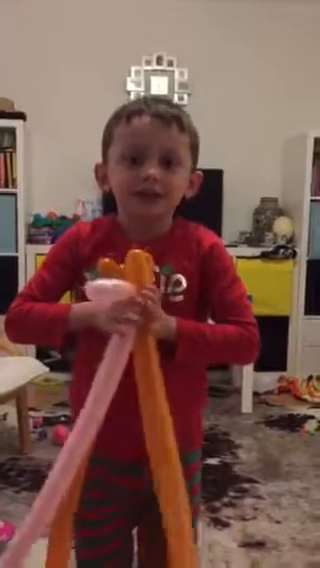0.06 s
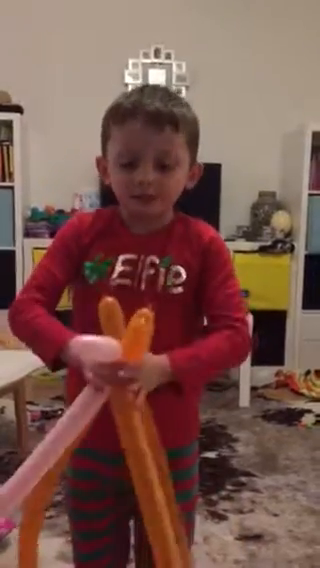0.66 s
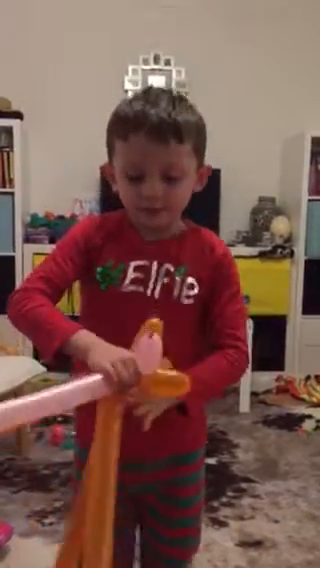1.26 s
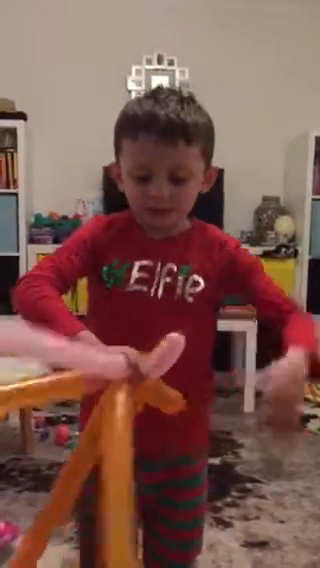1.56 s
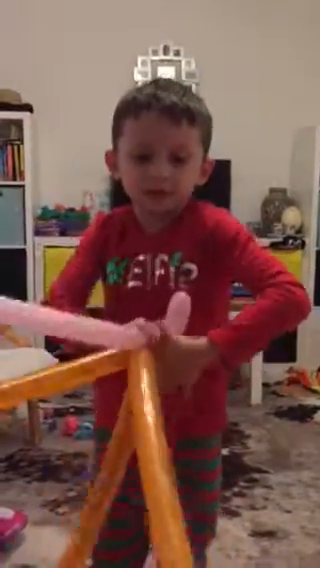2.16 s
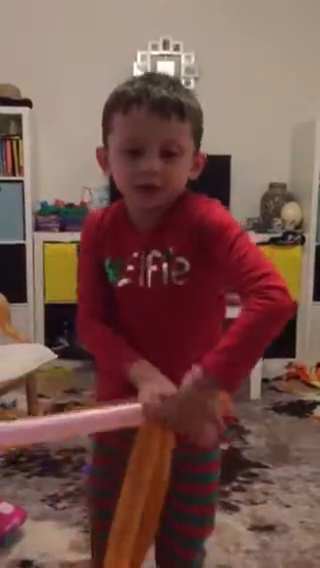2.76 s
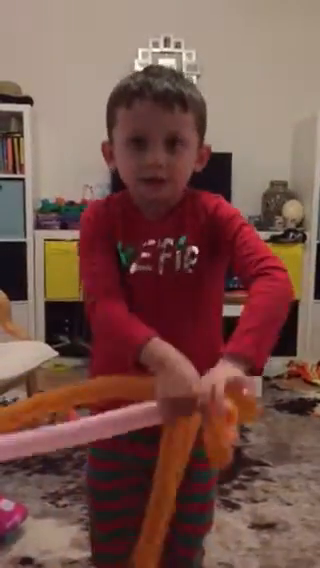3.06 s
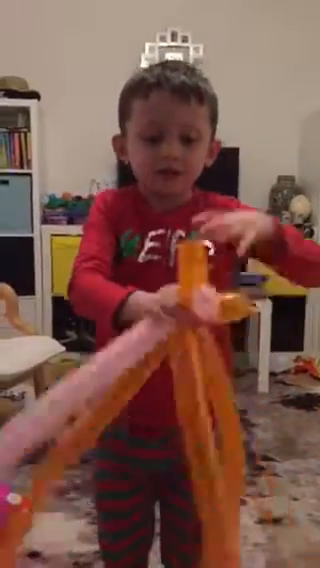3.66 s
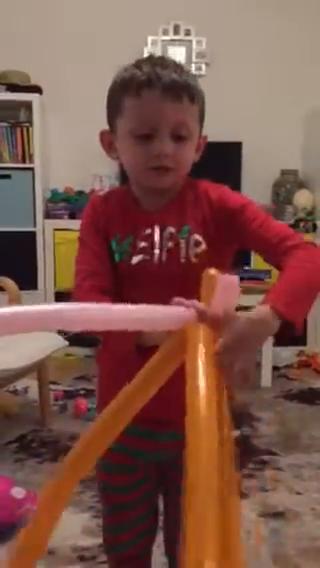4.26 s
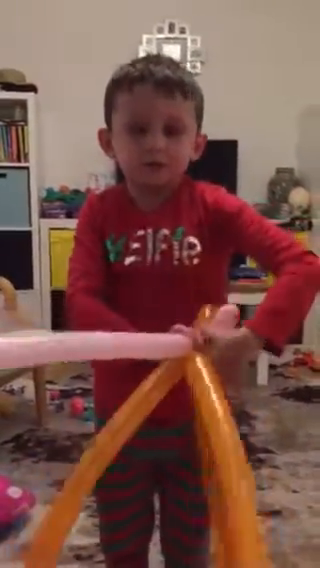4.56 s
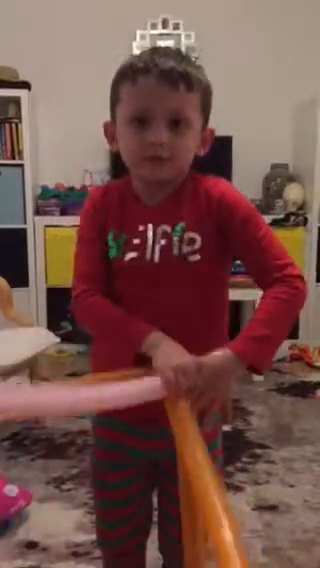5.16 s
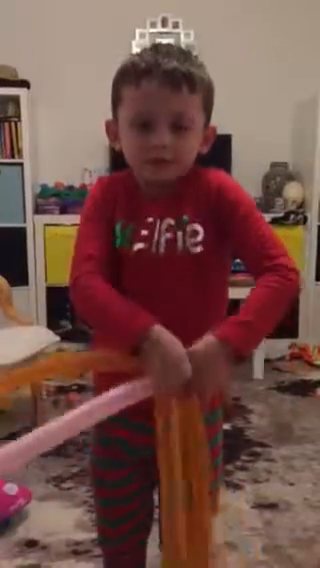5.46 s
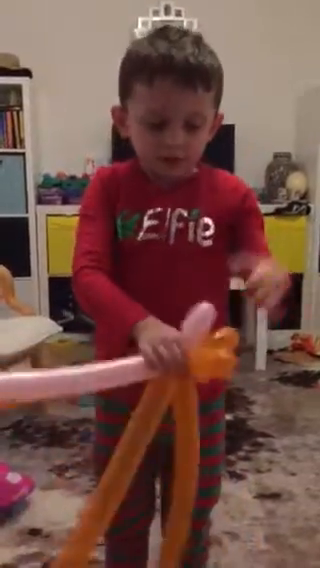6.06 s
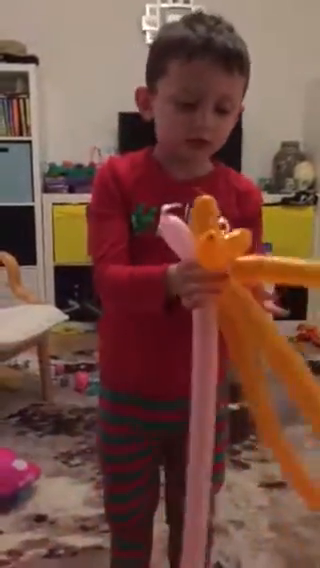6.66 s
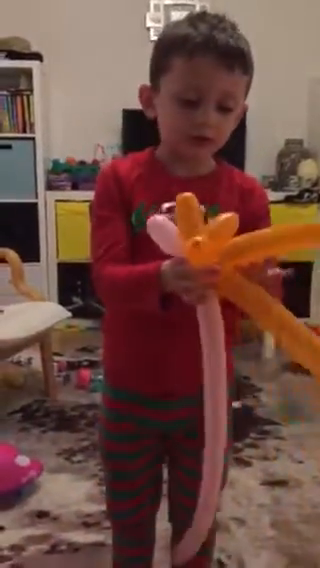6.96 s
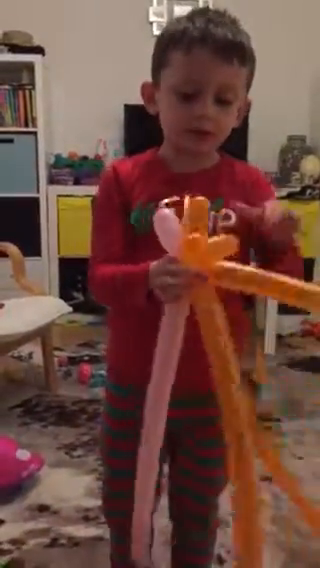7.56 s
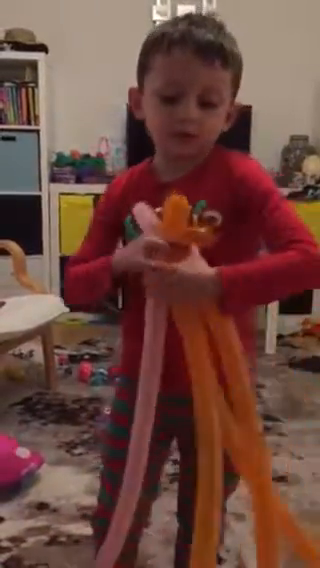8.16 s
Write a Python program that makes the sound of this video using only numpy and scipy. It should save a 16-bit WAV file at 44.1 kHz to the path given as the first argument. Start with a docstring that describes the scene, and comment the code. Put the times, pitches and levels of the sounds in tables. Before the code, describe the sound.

Close by in a softly reverberant room, hands twist long balloons, making uneven rubbery snaps, creaks and short scraping rubs with small gaps between them. The tubes bump with a hollow sound and brush against cloth. Two strong snaps stand out around the middle, and some short squeaks follow. Near the end comes the busiest, loudest flurry of snaps, then a faint crackle of fingers gripping the latex.

```python
"""Long latex balloons are twisted together by hand in a living room.
Stick-slip friction drives the stretched skin: one release is a snap, irregular slips are a rub,
periodic slips are a creak or, when faster, a squeak. Knocks send bending waves along the tubes,
and the air in a tied-off bubble resonates. Fingers creep, latex hisses over a sleeve,
and the room reverberates above a faint hush."""
import sys
import numpy as np
from scipy import signal
from scipy.fft import rfft, irfft
from scipy.io import wavfile
from scipy.ndimage import uniform_filter1d, map_coordinates

SR = 44100
rng = np.random.default_rng(int(sys.argv[2]) if len(sys.argv) > 2 else 0)


def dump_mix(stems):
    """Bounce the given channels to the path in sys.argv[1] as a 16-bit WAV at rate SR."""
    frames = np.atleast_2d(stems).T  # one column per channel
    limited = np.clip(frames, -1, 1)  # hard clip at full scale
    pcm = np.round(limited * 32767).astype(np.int16)
    wavfile.write(sys.argv[1], SR, pcm)


N = 366030
TAPS = 2048
BINS = np.maximum(np.fft.rfftfreq(TAPS, 1 / SR), 1)  # filter frequencies in Hz


def snaps(gentle_db=-21, chatter=0.4, chatter_s=0.0013, low_cut_hz=260):
    """Impulsive release: the skin lets go at once and chatters, more briefly where it is taut."""
    # sudden slips: start_s, level_db, taut_db, patch_hz
    releases = [(0.0868, -6.5, -6.5, 3050), (0.1426, -8, -6.5, 1080), (0.1499, -9.5, -5, 2670),
                (0.1626, 2.5, -2, 2340), (0.1868, -22, -7, 2540), (0.2707, -20, -5, 2500),
                (0.2928, -23.5, -4.5, 3040), (0.6192, -11.5, -3, 2000), (0.696, -9, -8.5, 1010),
                (0.871, -21.5, 11.5, 1400), (1.047, -11.5, -5, 730), (1.4071, -16, -9.5, 730),
                (1.962, -18.5, -4, 2380), (1.987, -27, 4, 2400), (2.0697, -20.5, -6, 9500),
                (2.7541, -18.5, 1.5, 910), (2.899, -22.5, 2.5, 9860), (2.966, -15, 1, 6770),
                (3.41, -19, 4.5, 5600), (3.6268, -6, -8.5, 1800), (3.7401, -16, -7.5, 5270),
                (3.7529, -12, -11, 674), (4.0183, 3, -10, 1650), (4.457, -21, 0.5, 6000),
                (4.5581, 4, 1.5, 3750), (4.7738, -19.5, -5, 7600), (5.2228, -18.5, -10.5, 1510),
                (5.258, -25.5, -6.5, 6460), (5.369, -19, -1.5, 820), (5.4389, -10, 1, 910),
                (5.4678, -12.5, -5, 6460), (5.5124, -1.5, -2, 11800), (5.9108, 0, -4.5, 1400),
                (6.2251, -19.5, 9, 1250), (6.3188, -25.5, 7.5, 12300), (6.3398, -35.5, 11.5, 11400),
                (6.3994, -21, -1, 12600), (6.6295, -21.5, -5, 1820), (6.8611, -9.5, -3, 9860),
                (6.8734, -9, -5, 7200), (6.8787, 6, 1, 3900), (6.8918, 0, -3.5, 3380),
                (6.909, -4, -8, 5500), (6.9371, -10, -2.5, 700), (6.9474, -5.5, -8, 3800),
                (7.03, -4.5, -11, 3470), (7.0972, 10.5, -1.5, 9100), (7.2739, -3.5, -4, 955),
                (7.3046, -10.5, -3.5, 5100), (7.3933, -11, -5.5, 1300), (7.4436, -6.5, -10, 610),
                (7.4509, -11, -7, 3260), (7.5, -6, -9, 2080), (7.8229, -9.5, 4.5, 2720),
                (7.8291, -7, 7.5, 3100), (7.954, -1.5, -4.5, 1640), (8.226, -9.5, 2, 1080)]
    out, t = np.zeros(N), clock(0.011)
    for s, db, taut_db, patch_hz in releases:
        drive = chatter * rng.standard_normal(len(t)) * np.exp(-t / chatter_s * 2 ** (taut_db / 12))
        drive[0] = -1  # the release itself
        spectrum = rfft(drive)
        drive = irfft(spectrum / np.sqrt(abs(spectrum)), len(t))  # partly flattens the spectrum
        drive /= np.linalg.norm(drive)
        tilt = stretch(taut_db, db - gentle_db)
        add(out, s, skin(drive, db, *tilt, patch_hz, patch_db=8, octaves=0.25))
    return signal.lfilter(*signal.butter(2, low_cut_hz, "high", fs=SR), out)


def rubs(gentle_db=-53, judder_db=5, catches_per_s=260, soft_hz=2500):
    """Irregular stick-slip: skin drags over skin in a shower of tiny slips and larger catches."""
    # rubbing strokes: start_s, length_s, level_db, taut_db, patch_hz
    strokes = [(0.452, .11, -58, -1, 1090), (0.862, 0.048, -41, -7, 1430), (0.969, 0.079, -42, -6, 1770),
               (1.4, 0.12, -49.5, 0.5, 2080), (1.457, 0.019, -27.5, 2.5, 764), (2.06, 0.14, -55, -8, 2110),
               (2.752, 0.098, -55.5, -14.5, 755), (3.319, 0.01, -45.5, 1, 1120),
               (3.566, 0.096, -44.5, -1, 686), (4.098, 0.028, -31.5, 0.5, 2070),
               (4.225, 0.091, -50.5, 2.5, 12500), (4.537, 0.04, -40.5, -3.5, 2300),
               (4.736, 0.026, -47.5, -9, 2860), (4.878, 0.045, -54.5, -3.5, 1070),
               (5.184, 0.057, -57.5, -7, 1400), (5.432, 0.15, -44, -5, 6800),
               (5.766, 0.056, -31, -6.5, 9300), (5.894, 0.087, -41, -1, 1180), (6.077, 0.061, -39, -7, 616),
               (6.73, 0.024, -49, -3.5, 1420), (6.89, 0.085, -42, -8, 3880),
               (7.486, 0.017, -47, 2.5, 12100), (7.825, 0.052, -31, -2.5, 2970),
               (8.112, 0.13, -56, 2.5, 1990)]
    out = np.zeros(N)
    for s, length, db, taut_db, patch_hz in strokes:
        count = len(clock(length))
        cycles = np.cumsum(catches_per_s * np.exp(0.45 * wander(count, catches_per_s))) / SR
        # a large slip lets go more slowly
        catches = signal.lfilter(*signal.butter(1, soft_hz, fs=SR), pulse_train(cycles))
        drive = slips(count, per_s=2200, spread_db=3.5) + 0.86 * catches
        drive = np.tanh(unit_rms(drive) / 2) * amp(judder_db * wander(count, catches_per_s))
        drive = unit_rms(drive * stroke(count, skew=0.7, fullness=0.6))
        tilt = stretch(taut_db, db - gentle_db)
        add(out, s, skin(drive, db, *tilt, patch_hz, patch_db=6, octaves=0.18))
    return out


def creaks(gain_db=-3, gentle_db=-41, taut_db=-10, soft_hz=2300, jitter=0.08, uneven_db=3.5):
    """Relaxation oscillation: slack skin under steady pull slips almost periodically, with grit."""
    # creaking strokes: start_s, length_s, level_db, first_slips_per_s, last_slips_per_s, patch_hz
    strokes = [(0.587, 0.046, -48, 157, 180, 664), (0.7, 0.073, -47.5, 108, 134, 594),
               (0.822, 0.035, -49, 222, 254, 524), (1.122, 0.051, -44.5, 152, 196, 880),
               (2.279, 0.023, -52.5, 380, 280, 605), (3.959, 0.038, -50.5, 80, 103, 424),
               (4.004, 0.016, -31.5, 310, 220, 557), (4.03, 0.046, -38.5, 140, 130, 560),
               (4.085, 0.056, -30, 415, 450, 1300), (4.369, 0.0131, -46.5, 336, 410, 1520),
               (4.95, 0.045, -51, 367, 206, 720), (5.369, 0.037, -43, 210, 160, 680),
               (5.619, 0.04, -49.5, 305, 180, 2300), (5.742, 0.021, -41.5, 250, 290, 2250)]
    out = np.zeros(N)
    for s, length, db, first_per_s, last_per_s, patch_hz in strokes:
        count = len(clock(length))
        cycles = glide(count, first_per_s, last_per_s, jitter, per_s=first_per_s)
        pulses = pulse_train(cycles)
        pulses = signal.lfilter(*signal.butter(2, soft_hz, fs=SR), pulses - pulses.mean())
        grit = 0.5 * (1 - cycles % 1) ** 2 * rng.standard_normal(count)
        pressure = amp(uneven_db * wander(count, first_per_s)) * stroke(count, skew=0.71, fullness=0.26)
        drive = (pulses + grit) * pressure
        tilt = stretch(taut_db, db - gentle_db)
        add(out, s, skin(drive, db + gain_db, *tilt, patch_hz, patch_db=7, octaves=0.27))
    return out


def squeaks(jitter=0.028, flutter_db=3, rasp_db=-18):
    """Self-excited oscillation: fast stick-slip locks to a gliding tone, rasping on every cycle. The briefest
    rows, a few milliseconds long, are the short pitched ring that follows a hard snap."""
    # pitched slips, and the brief rings after hard snaps: start_s, length_s, level_db, first_hz, last_hz,
    # overtone_db_per_octave
    chirps = [(1.498, 0.029, -42.5, 575, 537, -39), (4.559, 0.0034, -24.5, 2340, 3020, -12),
              (5.625, 0.08, -45, 631, 671, -11), (6.112, 0.018, -33, 1196, 1276, -21),
              (6.121, 0.04, -43, 1306, 1385, -17), (6.161, 0.0485, -51, 1405, 1250, -23),
              (6.226, 0.039, -60, 1236, 1300, -22), (7.952, 0.0043, -31.5, 2850, 2660, -23)]
    out = np.zeros(N)
    for s, length, db, first_hz, last_hz, slope_db in chirps:
        count = len(clock(length))
        cycles = glide(count, first_hz, last_hz, jitter, per_s=493)
        tone = sum(amp(slope_db * np.log2(k)) * np.sin(2 * np.pi * k * cycles) for k in range(1, 4))
        rasp = amp(rasp_db) * unit_rms(wander(count, 6000) * (cycles % 1))
        swell = stroke(count, skew=0.99, fullness=0.78) * amp(flutter_db * wander(count, 242))
        add(out, s, amp(db) * unit_rms((tone + rasp) * swell))
    return out


def skin(drive, db, bass_db, treble_db, patch_hz, patch_db, octaves):
    """Source and filter: the latex radiates a drive, tilted in tone, and the pinched patch resonates."""
    # response of the skin over the cross modes of a tube: frequency_hz, gain_db
    response = [(40, -12), (130, -1.5), (300, -10), (620, -2), (1000, -2.5), (1450, -2), (1900, -2),
                (2900, -1.5), (3900, 1), (5000, -1), (7000, 2), (9800, -2.5), (12000, -2), (16000, -9)]
    tilt = over_frequency([(650, bass_db), (2400, 0), (8500, treble_db)], BINS)
    patch = patch_db * np.exp(-0.5 * (np.log2(BINS / patch_hz) / octaves) ** 2)
    return colour(drive, db + tilt + patch + over_frequency(response, BINS))


def stretch(taut_db, force_db):
    """Spectral tilt as (bass, treble) in dB: tension trades bass for treble; force favours the middle."""
    return -taut_db - 0.15 * force_db, taut_db - 0.31 * force_db


def pinch(x, echo_s=0.001, shift=0.3, shifts_per_s=22, reflection=-0.6, dull_hz=2200):
    """Comb filtering: slips echo over the changing span from fingers to twist, duller on each trip."""
    earlier = np.arange(N) - echo_s * SR * np.exp(shift * wander(N, shifts_per_s))
    out = echo = x
    for _ in range(3):
        delayed = map_coordinates(echo, [earlier], order=1)
        echo = reflection * signal.lfilter(*signal.butter(1, dull_hz, fs=SR), delayed)
        out = out + echo
    return out * np.std(x) / np.std(out)


def bumps(wave_db=-4, main_db=-1.5, second_db=-6, sway_hz=95):
    """Impact excitation: a knock launches a bending wave, rings two modes and sways the whole tube."""
    # knocks on a tube: start_s, energy_db, main_hz, second_hz
    knocks = [(1.047, -24, 680, 443), (1.076, -25, 129, 186), (1.237, -27.5, 253, 454),
              (1.643, -14.5, 230, 435), (1.808, -13, 154, 101), (1.856, -21, 139, 215),
              (2.648, -19, 112, 560), (2.673, -22, 654, 217), (2.75, -12.5, 370, 232),
              (3.226, -31, 334, 296), (3.625, -9.5, 474, 302), (3.751, -11, 592, 447),
              (3.833, -6.5, 221, 327), (4.0137, 2.5, 561, 300), (4.127, -16, 191, 424),
              (4.689, -20, 397, 690), (5.37, -12.5, 147, 424), (5.775, -8, 105, 388),
              (5.835, -17, 123, 190), (5.906, -13, 346, 108), (5.969, -9.5, 353, 650),
              (6.315, -20.5, 186, 126.6), (6.49, -23, 200, 296), (7.2738, -12, 660, 191),
              (7.442, -11, 602, 297), (7.499, -10.5, 484, 189), (7.824, -9.5, 709, 237),
              (8.23, -15, 255, 177)]
    out = np.zeros(N)
    for s, db, main_hz, second_hz in knocks:
        add(out, s, amp(db + wave_db) * bending_wave(1.31 * np.sqrt(main_hz * second_hz)))
        add(out, s, amp(db + main_db) * wobble(main_hz) + amp(db + second_db) * wobble(second_hz))
        add(out, s, amp(0.6 * db - 15) * wobble(sway_hz, rise_cycles=2, fade_s=0.014, waver=0.038))
    return out


def bending_wave(centre_hz, first_s=0.004488, trip_s=0.0082, reflection=0.58, reference_hz=300):
    """Dispersion: a bending wave runs along the tube, highs ahead of lows, and returns from its ends."""
    hz = np.fft.rfftfreq(4 * TAPS, 1 / SR) + 1
    band = np.exp(-0.5 * np.log2(hz / centre_hz) ** 2) / np.sqrt(hz)
    delays_s = first_s + trip_s * np.arange(4) * rng.uniform(0.731, 1.3, 4)  # at reference_hz
    passes = sum(reflection ** k * np.exp(-4j * np.pi * delay * np.sqrt(hz * reference_hz))
                 for k, delay in enumerate(delays_s))
    wave = irfft(band * passes)
    return wave / np.linalg.norm(wave)


def wobble(hz, rise_cycles=1, fade_s=0.0076, waver=0.11, uneven_db=7.5, per_s=160):
    """Damped mode: one hollow resonance of a tube swells and dies, unsteady under the fingers."""
    t = clock(4 * TAPS / SR)
    phase = 2 * np.pi * glide(len(t), hz, hz, waver, per_s)
    envelope = (1 - np.exp(-t * hz / rise_cycles)) * np.exp(-t / fade_s)
    wave = np.sin(phase) * envelope * amp(uneven_db * wander(len(t), per_s))
    return wave / np.linalg.norm(wave)


def plucked_bubble(t60_s=0.24, waver=0.018):
    """Free decay: the air in a tied-off bubble rings after a slip, wavering as fingers squeeze it."""
    # plucks of the enclosed air: start_s, level_db, pitch_hz, overtones_db
    plucks = [(0.695, -40, 1373, -19), (1.472, -37.5, 1367, -26), (4.112, -36, 1285, -8),
              (4.561, -37, 1382, 2.5), (7.1, -29.5, 1450, -25), (8.229, -42, 1472, -27)]
    # upper modes of the bubble: pitch_ratio, level_db
    modes = [(2.072, -3), (2.172, -17), (2.75, -9), (3.861, -8)]
    out, t = np.zeros(N), clock(0.34)
    for s, db, hz, overtones_db in plucks:
        phase = 2 * np.pi * glide(len(t), hz, hz, waver, per_s=300)
        overtones = sum(amp(overtones_db + mode_db) * np.sin(ratio * phase) for ratio, mode_db in modes)
        add(out, s, amp(db - 60 * t / t60_s) * (np.sin(phase) + overtones))
    return out


def brushed_bubble(hz=1435, stage_q=17):
    """Noise-driven resonance: light brushing keeps the air in a bubble ringing hoarsely."""
    # strength of the ringing: time_s, level_db
    levels = [(6.25, -85), (6.48, -63), (6.6, -78), (7.0, -70), (7.12, -48), (7.25, -62), (7.5, -54),
              (7.68, -86), (7.78, -60), (7.84, -90)]
    resonator = np.concatenate(signal.iirpeak(hz, stage_q, SR))
    air = signal.sosfilt([resonator, resonator], rng.standard_normal(N))
    return unit_rms(air) * amp(over_time(levels))


def tube_air(x, q=45):
    """Sympathetic resonance: the air in the tubes sings faintly along with every contact."""
    # modes of the enclosed air: frequency_hz, gain_db
    modes = [(525, -11), (655, -9), (1430, -9), (2860, -14)]
    return sum(amp(db) * signal.lfilter(*signal.iirpeak(hz, q, SR), x) for hz, db in modes)


def peeling(rubbing, gain_db=-27, tick_s=0.0004, low_cut_hz=4600):
    """Adhesion: tacky spots peel apart in bright ticks, louder the harder the skin is rubbed."""
    effort = abs(uniform_filter1d(rubbing ** 2, size=1500)) ** 0.4
    releases = abs(slips(N, per_s=150, spread_db=4, cap=2.5))
    bursts = signal.fftconvolve(releases, np.exp(-clock(0.003) / tick_s))[:N]
    ticks = signal.lfilter(*signal.butter(2, low_cut_hz, "high", fs=SR), bursts * rng.standard_normal(N))
    return amp(gain_db) * effort * unit_rms(ticks)


def grip(gain_db=-7, clump_db=5, clumps_per_s=35):
    """Frictional creep: fingers edge over the latex in fits and starts, with a faint, dull crackle."""
    # the hands shifting their grip: time_s, level_db
    levels = [(0.0, -58), (.27, -49), (.34, -66.5), (0.99, -64), (1.25, -69.5), (2.0, -62.5), (2.5, -64.5),
              (3.5, -63.5), (4.29, -55), (4.348, -54.5), (5.08, -66.5), (5.7, -61.5), (6.1, -48.5),
              (6.55, -67.5), (6.82, -67), (7.049, -51.5), (7.7, -66.5), (8.06, -49.5), (8.3, -56.5)]
    drive = slips(N, per_s=900, spread_db=4, cap=2)
    crackle = skin(drive, db=0, bass_db=0, treble_db=-8, patch_hz=1700, patch_db=4, octaves=1)[:N]
    pressure_db = over_time(levels) + clump_db * wander(N, clumps_per_s)
    return unit_rms(crackle) * amp(gain_db + pressure_db)


def sleeve(flutter_db=3.5, flutter_per_s=90):
    """Sliding friction: the tubes sweep across a sleeve with a soft broadband hiss."""
    # latex sliding over cloth: time_s, level_db
    levels = [(2.88, -100), (2.901, -51.5), (3.04, -63), (3.15, -57.5), (3.29, -63), (3.38, -59),
              (3.415, -53), (3.48, -72), (3.6, -95)]
    # spectrum of the hiss: frequency_hz, level_db
    spectrum = [(300, -21), (2500, -1), (3600, 7), (5200, 2.5), (11000, 3), (16000, -6)]
    return noise(spectrum) * amp(over_time(levels) + flutter_db * wander(N, flutter_per_s))


def room(x, build_s=0.0019):
    """Reverberation: dense reflections build up in milliseconds; each band decays at its own rate."""
    # diffuse field of the room: frequency_hz, level_db, t60_s
    bands = [(89.5, 1.5, 0.35), (402, -4, 0.27), (1190, -2, 0.39), (2800, -1, 0.36), (6050, -3.5, 0.39),
             (14700, -9.5, 0.25)]
    t = clock(0.6)
    reflections = rng.standard_normal(len(t)) * (rng.random(len(t)) < 0.12)
    reflections *= 1 - np.exp(-(t / build_s) ** 2)
    hz, frame_s, spectra = signal.stft(unit_rms(reflections), SR, nperseg=256)
    t60_s = over_frequency(bands, hz, column=2)[:, None]
    unit_energy = np.sqrt(2 * np.log(1000) / (t60_s * SR))
    decay = amp(over_frequency(bands, hz)[:, None] - 60 * frame_s / t60_s)
    tail = signal.istft(spectra * unit_energy * decay, SR, nperseg=256)[1]
    return signal.fftconvolve(x, tail)[:N]


def still_air(level_db=-71):
    """Ambient noise: the even hush of the room."""
    # spectrum of the hush: frequency_hz, level_db
    spectrum = [(18, -38), (30, -8.5), (106, 2), (822, -13.5), (1430, -16.5), (1760, -31.5), (8980, -21),
                (16000, -32)]
    return amp(level_db) * noise(spectrum)


def slips(count, per_s, spread_db, cap=3.6):
    """Shot noise: tiny slips at random moments, a few much larger than the rest."""
    size = amp(spread_db * np.minimum(rng.exponential(1, count), cap)) * rng.choice([-1, 1], count)
    return unit_rms(size * (rng.random(count) < per_s / SR))


def stroke(count, skew, fullness):
    """Amplitude envelope: the pressure of a stroke builds and eases off."""
    return unit_rms(abs(np.sin(np.pi * np.linspace(0, 1, count) ** skew)) ** fullness)


def glide(count, first_hz, last_hz, jitter, per_s):
    """Frequency modulation: elapsed cycles of an unsteady linear sweep."""
    return np.cumsum(np.linspace(first_hz, last_hz, count) * (1 + jitter * wander(count, per_s))) / SR


def pulse_train(cycles):
    """One impulse for each completed cycle."""
    return unit_rms(np.diff(np.floor(cycles), prepend=0))


def wander(count, per_s):
    """Random modulation of about unit size, interpolated between per_s values a second."""
    position = np.arange(count) * per_s / SR
    knots = int(position[-1]) + 2
    return np.interp(position, np.arange(knots), rng.standard_normal(knots))


def noise(spectrum):
    """Gaussian noise of unit rms, shaped by a spectrum."""
    return unit_rms(colour(rng.standard_normal(N), over_frequency(spectrum, BINS))[:N])


def colour(x, db):
    """Causal filter with a gain in dB at each of BINS."""
    log_gain = np.log(amp(np.r_[db, db[-2:0:-1]]))
    minimum_phase = np.exp(signal.hilbert(log_gain).conj())
    return signal.fftconvolve(x, np.fft.ifft(minimum_phase).real)


def over_frequency(points, hz, column=1):
    """Interpolates one column of a table along log frequency."""
    table = np.transpose(points)
    return np.interp(np.log(hz + 1), np.log(table[0] + 1), table[column])


def over_time(points):
    """Interpolates a table of times and levels at every sample."""
    return np.interp(np.arange(N) / SR, *np.transpose(points))


def amp(db):
    """Decibels to gain."""
    return 10 ** (np.asarray(db) / 20)


def unit_rms(x):
    """Scales to an rms of one."""
    return x / np.sqrt(np.mean(x ** 2) + 1e-20)


def clock(length_s):
    """Sample times over a duration."""
    return np.arange(max(int(length_s * SR), 16)) / SR


def add(mix, start_s, sound):
    """Superposition: lays a sound into the mix."""
    part = mix[max(round(start_s * SR), 0):][:len(sound)]
    part += sound[:len(part)]


def scene(tone_wet=0.7):
    """Direct and diffuse sound: the balloons are near, with the room behind them."""
    rubbing = pinch(rubs() + grip()) + creaks()
    contact = snaps() + rubbing + peeling(rubbing) + bumps() + sleeve()
    tones = squeaks() + plucked_bubble() + brushed_bubble() + tube_air(contact)
    return (contact + tones + room(contact + tone_wet * tones) + still_air())[None]


def record(dry, low_cut_hz=48, high_cut_hz=16300):
    """Band limiting: the microphone sheds the deepest bass, and a steep filter the highest treble."""
    thinned = signal.sosfilt(signal.butter(3, low_cut_hz, "high", fs=SR, output="sos"), dry)
    low_pass = signal.firwin(301, high_cut_hz, window=("kaiser", 9), fs=SR)
    return signal.oaconvolve(thinned, low_pass[None], "same")


dry = scene()
out = record(dry)
dump_mix(out)
```